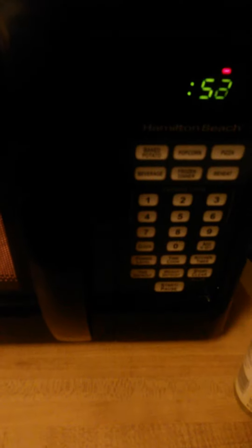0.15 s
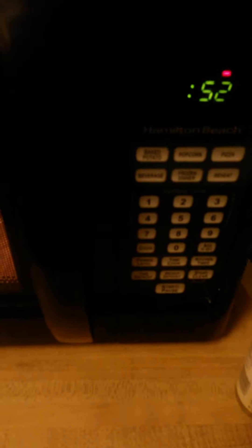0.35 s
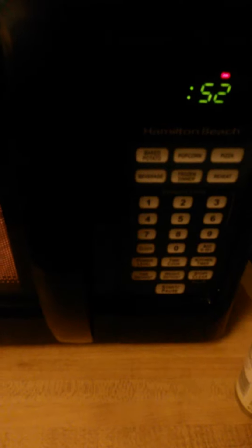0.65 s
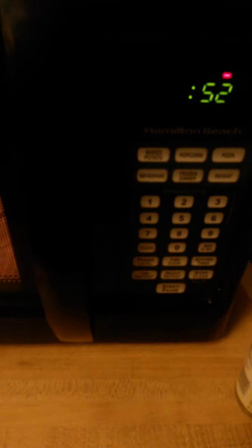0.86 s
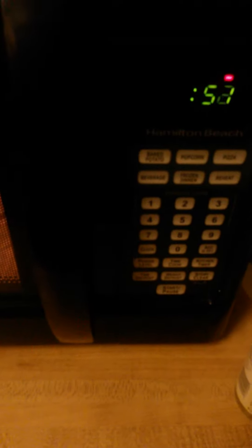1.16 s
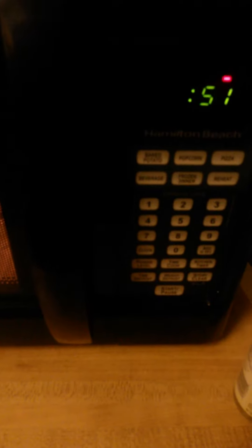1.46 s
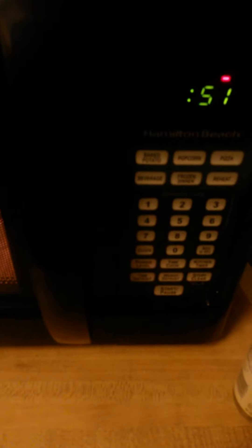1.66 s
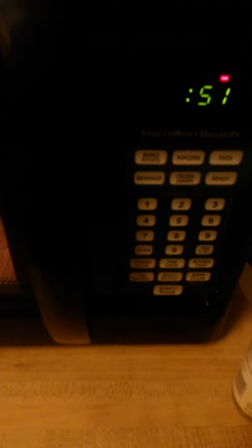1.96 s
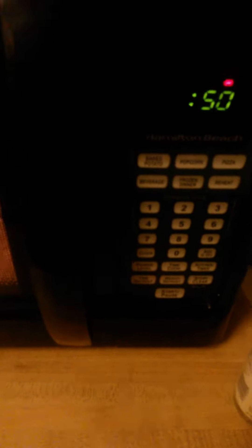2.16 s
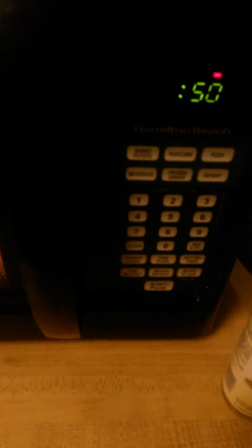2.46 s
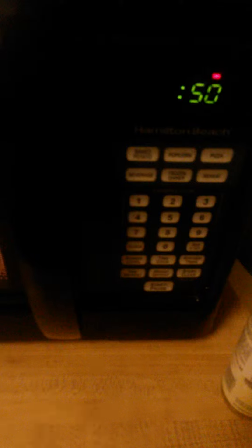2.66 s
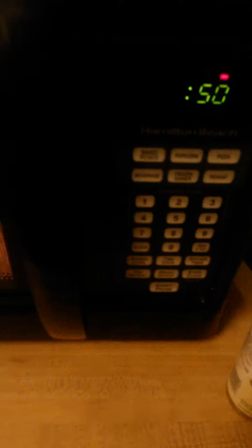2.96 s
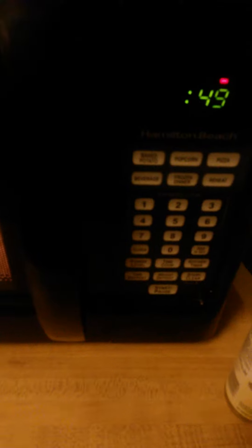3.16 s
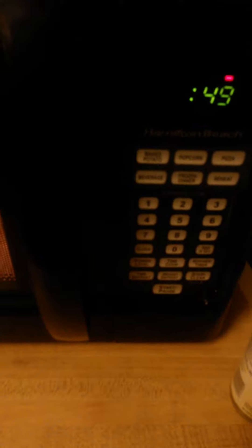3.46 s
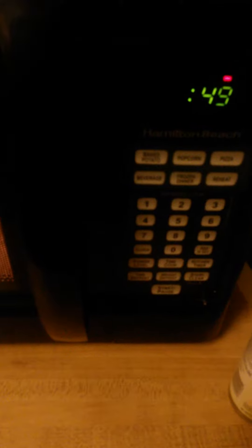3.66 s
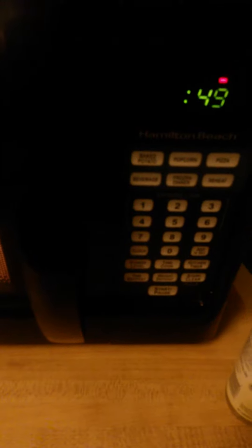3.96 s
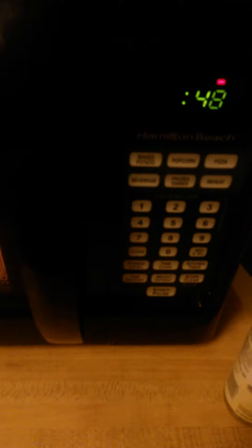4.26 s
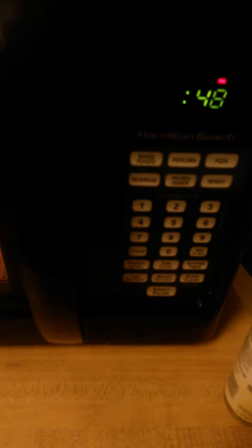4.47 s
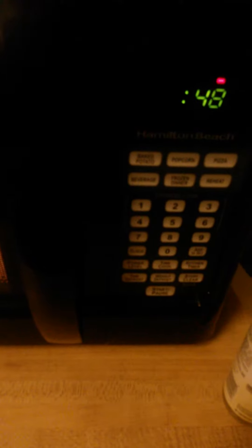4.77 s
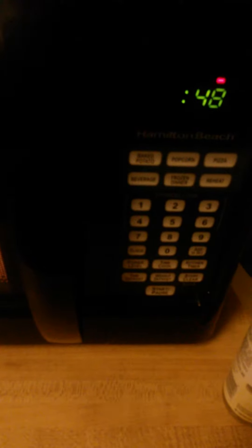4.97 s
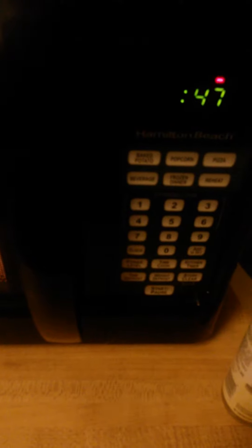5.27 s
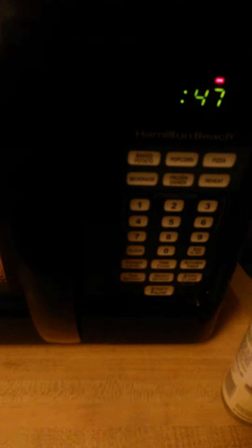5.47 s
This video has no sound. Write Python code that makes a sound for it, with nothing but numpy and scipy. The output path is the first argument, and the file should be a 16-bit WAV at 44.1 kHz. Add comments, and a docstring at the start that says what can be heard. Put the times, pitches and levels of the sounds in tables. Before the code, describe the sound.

A microwave oven runs close in front of a stereo microphone in a quiet kitchen. A deep 120 Hz hum and a lower-pitched fan drone beat together, over rumbling air, soft vent hiss and faint buzz. Two barely audible turntable scuffs come early and near the middle; nothing starts or stops.

```python
"""A microwave oven hums and buzzes on a kitchen counter, close in front of the microphone.
Transformer: lines on multiples of the mains, plus a comb of fine buzz and a thin whine.
Fan: shaft and blade tones, a little slower than the mains, beating against the hum.
Air: shaped noise, rumbling in the case and hissing from the vents.
Turntable: two scuffs of band-passed noise and very faint arched squeaks."""
import sys
import numpy as np
from scipy import signal
from scipy.fft import rfft, irfft
from scipy.io import wavfile
from scipy.ndimage import uniform_filter1d

SR = 44100
rng = np.random.default_rng(int(sys.argv[2]) if len(sys.argv) > 2 else 0)


def log_audio(samples):
    """Write samples as a 16-bit WAV file to the path given in sys.argv[1]."""
    # one column per channel
    frames = np.atleast_2d(samples).T
    # limit to full scale, then quantise
    limited = np.clip(frames, -1, 1)
    pcm = np.round(limited * 32767).astype(np.int16)
    wavfile.write(sys.argv[1], SR, pcm)


N = 247401
T = np.arange(N) / SR

MAINS_HZ, FAN_HZ, BLADES = 60.035, 45.947, 4
TOP_HZ = 14550
PORT_LAG_S = 0.0003
SWELL_DB_PER_S, SWELL_BELOW_HZ = 0.43, 270
SQUEAK_BEND_HZ_PER_S2, SQUEAK_ROUGH = 150000, 0.006

# turntable roller scuffs: centre t/s, width t/s, left level/dB
SCUFFS = [(0.42, 0.039, -45), (2.41, .04, -45.5)]
# turntable squeaks: centre t/s, half-length t/s, f/Hz, right level/dB
SQUEAKS = [(2.49, .11, 14300, -55), (2.615, .14, 14150, -59), (2.725, .06, 11600, -60),
           (2.835, .03, 12050, -59)]
# air churning in the case: f/Hz, left level/dB per Hz, right level/dB per Hz
RUMBLE_SPECTRUM = [(27.8, -90, -88), (66.6, -82, -82), (95, -68, -68), (138, -69, -67), (183, -64, -61.5),
                   (245, -65.5, -67), (340, -69, -78.5), (432, -68.5, -76), (545, -75.5, -76),
                   (680, -72, -70.5), (800, -73, -72.5), (884, -79, -84), (1400, -95, -87),
                   (4000, -106, -106)]
# air leaving the vents: f/Hz, left level/dB per Hz, right level/dB per Hz
HISS_SPECTRUM = [(496, -94, -88.5), (1140, -78.5, -81.5), (1400, -86, -81), (1650, -82.5, -80),
                 (1950, -87.5, -77.5), (2110, -86, -84), (2680, -84.5, -85), (3220, -87, -87),
                 (3670, -87, -91), (4430, -88, -91.5), (4830, -81.5, -92.5), (6220, -82.5, -93),
                 (6930, -92, -90.5), (9570, -104, -95.5), (11700, -106, -87), (15100, -100, -98)]
# hollow resonances of air duct and case: f/Hz, width f/Hz, left lift/dB, right lift/dB
DUCT_MODES = [(900, 45, -1, 3), (1270, 67, 6.5, 8), (1530, 56, 6.5, 7.5), (1740, 60, 3, 1.5),
              (1963, 45, 6, 4.5), (2170, 60, 9, 8), (2390, 120, 2.5, 2), (3550, 150, 5.5, 0)]
# four-bladed fan: multiple of shaft rate, left level/dB, right level/dB
FAN_LINES = [(1, -56.5, -58), (2, -46, -41), (3, -50.5, -60), (4, -32, -30.5), (5, -57, -60),
             (6, -51.5, -56), (7, -57, -76), (8, -45, -43), (9, -55, -74), (10, -59, -75),
             (12, -59.5, -58.5), (15, -53.5, -60.5), (16, -57.5, -61), (18, -69, -57.5), (20, -63, -60.5)]
# rotor swings the motor's magnetic pull: multiple of mains, multiple of shaft rate,
# left level/dB, right level/dB
MOTOR_SIDEBANDS = [(2, 1, -45, -41.5), (3, -1, -55, -57), (2, 3, -67, -60), (4, 1, -66, -70)]
# fine buzz of the high-voltage parts: f/Hz, left level/dB per line, right level/dB per line
BUZZ_SPECTRUM = [(1680, -89, -73), (2900, -88, -84), (4300, -85, -94), (5760, -79, -93), (7150, -98, -90),
                 (9400, -110, -99), (10500, -110, -89), (12200, -108, -81), (13600, -103, -80),
                 (14400, -99, -90)]
# thin whine: f/Hz, left level/dB, right level/dB
WHINE_LINE = (11918, -108, -72)
# transformer and case panels: multiple of mains, left level/dB, right level/dB
HUM_LINES = [(1, -65, -59), (2, -31, -28.5), (3, -48.5, -39), (4, -55.5, -47.5), (5, -61, -64),
             (6, -65, -46), (8, -54.5, -50.5), (10, -48.5, -48.5), (11, -55.5, -57.5), (12, -53.5, -48.5),
             (14, -68, -58), (18, -55.5, -78), (20, -62, -57.5), (22, -65, -61.5), (24, -72, -71),
             (26, -60, -56.5), (27, -74, -74), (28, -71, -56.5), (30, -75, -79), (34, -69, -66),
             (36, -75, -66), (53, -81, -69), (99, -61, -76), (100, -66, -80), (101, -66, -79)]


def undb(db):
    """Decibels to gain."""
    return 10 ** (np.asarray(db) / 20)


def walk(rate_hz):
    """Random levels held 1 / rate_hz and slewed twice; spread near 1."""
    hold = max(int(SR / rate_hz), 1)
    steps = np.repeat(rng.standard_normal(N // hold + 1), hold)
    slewed = uniform_filter1d(uniform_filter1d(steps, hold), hold)
    return 1.26 * slewed[:N]


def gains(table, hz):
    """Left and right gain of a spectrum, interpolated over log frequency."""
    points_hz, *sides_db = np.transpose(table)
    return undb([np.interp(np.log(hz + 1), np.log(points_hz), db) for db in sides_db])


def air(table, likeness, modes=()):
    """Turbulent stereo noise, lifted at resonant modes; likeness(hz) is the power share common to both sides."""
    hz = np.arange(N // 2 + 1) * SR / N
    share = np.clip(likeness(hz), 0, 1)
    common = rfft(rng.standard_normal(N))
    own = rfft(rng.standard_normal((2, N)))
    lift_db = 0
    for centre_hz, width_hz, left_db, right_db in modes:
        peak = 1 / (1 + (2 * (hz - centre_hz) / width_hz) ** 2)
        lift_db = lift_db + np.array([[left_db], [right_db]]) * peak
    mix = np.sqrt(share) * common + np.sqrt(1 - share) * own
    # sqrt(SR / 2): white noise to unit power per Hz
    return irfft(mix * gains(table, hz) * undb(lift_db), N) * np.sqrt(SR / 2)


def tone(hz, sides_db, clock_s, waver_db=1.5, diffuse_hz=800):
    """One line at RMS level; kitchen reflections set the two sides further apart in phase as hz rises."""
    start = rng.uniform(0, 2 * np.pi)
    scatter = rng.uniform(-0.88, 1) * min(hz / diffuse_hz, 2)
    lag = 2 * np.pi * PORT_LAG_S * hz / (1 + (hz / diffuse_hz) ** 2)
    phase = 2 * np.pi * hz * clock_s + start + np.array([[0.5], [-0.5]]) * (scatter - lag)
    return np.sqrt(2) * undb(sides_db)[:, None] * undb(waver_db * walk(9)) * np.sin(phase)


def turntable(scuff_hz=3800, squeak_left_db=-8):
    """Rollers brush the cavity floor; each squeak's pitch sags either side of its middle and trembles."""
    band_hz = [scuff_hz / 1.34, scuff_hz * 1.48]
    band = signal.butter(2, band_hz, "band", fs=SR, output="sos")
    rub = signal.sosfilt(band, rng.standard_normal((2, N)))
    pressure = sum(undb(db) * np.exp(-(2 * (T - centre_s) / width_s) ** 2)
                   for centre_s, width_s, db in SCUFFS)
    out = rub / rub.std() * np.array([[1], [0.5]]) * pressure
    for centre_s, half_s, hz, db in SQUEAKS:
        offset_s = np.clip(T - centre_s, -half_s, half_s)
        contact = np.cos(np.pi / 2 * offset_s / half_s) ** 2
        pitch_hz = hz * (1 + SQUEAK_ROUGH * walk(400)) - SQUEAK_BEND_HZ_PER_S2 * offset_s ** 2
        squeak = np.sin(2 * np.pi * np.cumsum(pitch_hz) / SR)
        out = out + undb([[db + squeak_left_db], [db]]) * contact * squeak
    return out


def airflow(alike_hz=650, churn_db=1.1, flutter_db=0.47, blade_chop=0.063):
    """Turbulence: deep rumble reaches both sides alike, chopped by the blades; hiss rings the duct."""
    rumble = air(RUMBLE_SPECTRUM, lambda hz: 1 / (1 + (hz / alike_hz) ** 2))
    hiss = air(HISS_SPECTRUM, lambda hz: 0.12 * (hz < 7000), DUCT_MODES)
    chop = 1 + blade_chop * np.sin(2 * np.pi * BLADES * FAN_HZ * T)
    return rumble * undb(churn_db * walk(14)) * chop + hiss * undb(flutter_db * walk(22.02))


def fan(clock_s, wander_s=0.00029):
    """Shaft and blade tones at a slightly unsteady speed, plus the motor's sidebands on the hum."""
    shaft_s = clock_s + wander_s * walk(1.535)
    blades = sum(tone(k * FAN_HZ, sides_db, shaft_s, waver_db=0.13) for k, *sides_db in FAN_LINES)
    sidebands = sum(tone(m * MAINS_HZ + k * FAN_HZ, sides_db, clock_s)
                    for m, k, *sides_db in MOTOR_SIDEBANDS)
    return blades + sidebands


def buzz(clock_s, uneven_db=5, size=4096):
    """High-voltage sizzle repeating every mains cycle: a comb of thin lines, uneven by up to +-uneven_db."""
    hz = np.arange(size // 2 + 1) * MAINS_HZ
    in_band = (hz > BUZZ_SPECTRUM[0][0]) & (hz < TOP_HZ)
    lines = gains(BUZZ_SPECTRUM, hz) * in_band * undb(uneven_db * rng.uniform(-1, 1, len(hz)))
    phases = np.exp(2j * np.pi * rng.random(lines.shape))
    cycle = irfft(lines * phases) * size / np.sqrt(2)
    position = clock_s * MAINS_HZ % 1
    return np.array([np.interp(position, np.arange(size) / size, side) for side in cycle])


def transformer(clock_s, steady_db=0.1, loose_db=1.4):
    """Core flexes with the mains and shakes the panels; deep notes swell slowly, high ones rattle unsteadily."""
    swell = undb(SWELL_DB_PER_S * (T - T.mean()))
    out = tone(WHINE_LINE[0], WHINE_LINE[1:], clock_s, waver_db=3.0)
    for k, *sides_db in HUM_LINES:
        hz = k * MAINS_HZ
        waver_db = np.interp(hz, [120, 1500], [steady_db, loose_db])
        line = tone(hz, sides_db, clock_s, waver_db=waver_db)
        out = out + line * (swell if hz < SWELL_BELOW_HZ else 1)
    return out


def scene():
    """Hum, buzz and fan share one barely drifting mains clock; air and turntable are added."""
    clock_s = T + 5e-6 * walk(1)
    return turntable() + airflow() + fan(clock_s) + buzz(clock_s) + transformer(clock_s)


def record(dry):
    """The recorder cuts the top: steep low-pass at TOP_HZ."""
    low_pass = signal.ellip(12, 0.1, 80, TOP_HZ, fs=SR, output="sos")
    return signal.sosfilt(low_pass, dry)


dry = scene()
out = record(dry)
log_audio(out)
```